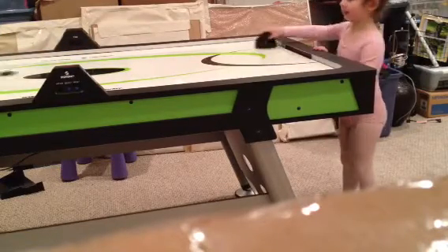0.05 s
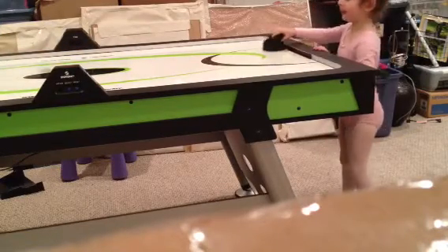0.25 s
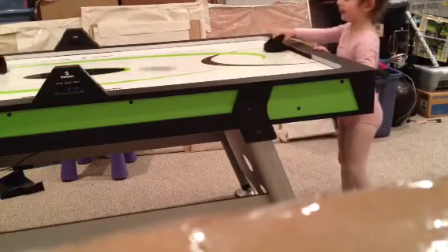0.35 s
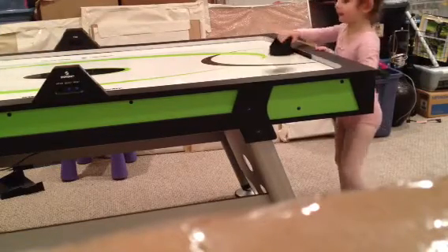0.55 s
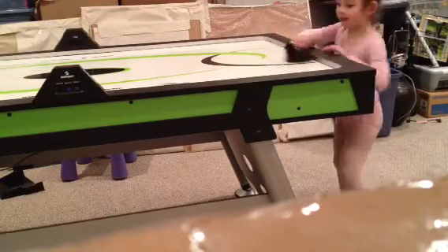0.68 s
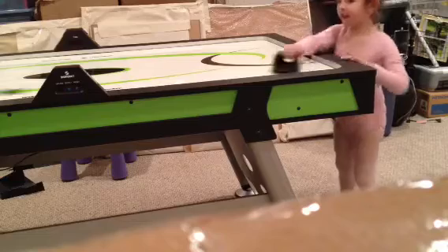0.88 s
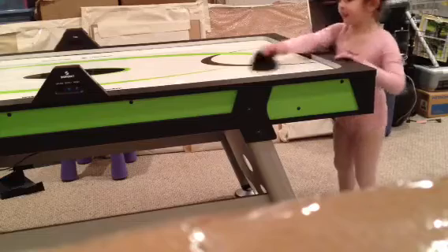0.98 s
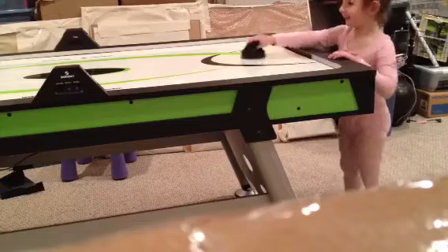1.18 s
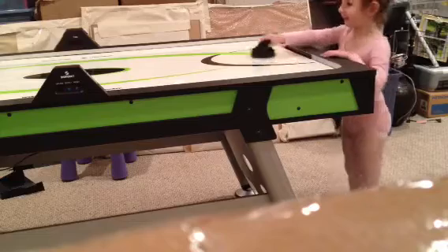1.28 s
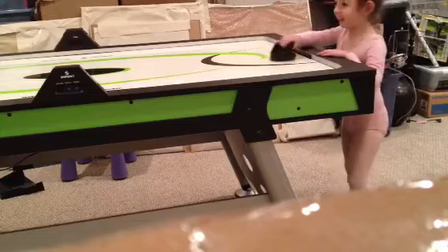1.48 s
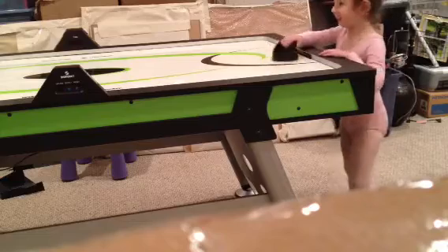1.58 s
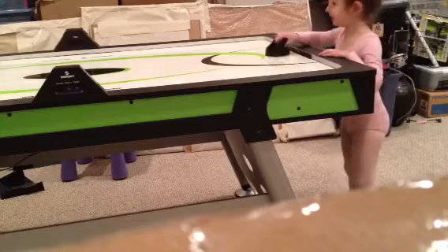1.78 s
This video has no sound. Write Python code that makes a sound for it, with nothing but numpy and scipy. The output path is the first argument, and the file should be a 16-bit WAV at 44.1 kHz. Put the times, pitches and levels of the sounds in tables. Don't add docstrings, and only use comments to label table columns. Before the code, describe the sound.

An air hockey puck gives two faint touches, a hard clack with a hollow table boom, another clack and a soft one, then two quick clacks and a last one, over a soft blower hiss, close microphone.

```python
import sys
import numpy as np
from scipy import signal
from scipy.fft import rfft, irfft, next_fast_len
from scipy.io import wavfile
from scipy.ndimage import uniform_filter1d, map_coordinates

SR = 44100
rng = np.random.default_rng(int(sys.argv[2]) if len(sys.argv) > 2 else 0)


def wav_record(signal):
    frames = np.transpose(np.atleast_2d(signal))
    bounded = np.clip(frames, -1, 1)
    quanta = np.round(bounded * 32767).astype(np.int16)
    wavfile.write(sys.argv[1], SR, quanta)


def volts_from_decibels(level):
    exponent = np.asarray(level, float) / 20
    return 10 ** exponent


N = 81585

# start_s, level_db, direct_over_echoes_db, ceiling_echo_db
CONTACTS = [
    (0.1253, -35.5, -1.5, 5),
    (0.148, -30.5, -9, -21),
    (0.2085, -13, 0.5, 1.5),
    (.5392, -12.5, -8, -5),
    (.6990, -27.5, 1, -2.5),
    (1.1230, -14, -2, 3),
    (1.2031, -13, 1.5, 1.5),
    (1.4969, -15, -1, -1),
]
# start_s, level_under_nearest_contact_db
CHATTER = [(.136, -9.5), (.5610, -9), (.7080, 0.5), (.7165, -4.5), (1.1195, -23), (1.1595, -31),
           (1.4961, -13.5), (1.5285, -24)]
# pitch_hz, level_db
DULL_COLOURS = [
    [(150, -33), (280, -14.5), (600, -2.5), (950, -9.5), (1450, -19.5), (3300, -24), (5200, -42)],
    [(150, -30), (270, -11), (430, -12.5), (517, 4), (620, -17), (1000, -19.5), (1500, -33), (4000, -46.5)],
]
# pitch_hz, level_db
CLACK_COLOURS = [
    [(170, -17), (260, -13.5), (1350, -11.5), (1620, -1.5), (3100, -4.5), (3800, -11), (12300, -22.5),
     (15500, -26)],
    [(200, -31), (480, -4.5), (950, 2), (1200, -3), (3000, -3), (5000, -7), (5600, -22.5), (15500, -25)],
    [(200, -15.5), (650, -3), (850, 3), (2140, -1.5), (5000, -15.5), (5600, -26), (12000, -35.5),
     (15500, -52)],
    [(170, -27), (350, -10), (1300, -16), (1570, -2), (3050, -2.5), (3700, -11.5), (9000, -19.5),
     (15500, -27.5)],
    [(200, -30.5), (490, -4.5), (1060, -2.5), (2900, -4), (5000, -10.5), (5600, -23.5), (11000, -25),
     (15500, -39)],
    [(200, -38), (510, -3), (1340, -3), (1570, 0.5), (2550, -4), (4800, -9), (5600, -19.5), (15500, -28)],
]
# pitch_hz, t60_s
PUCK_MODES = [(8170, 0.014), (10340, 0.027), (12150, 0.012)]
# first_mode_db, second_mode_db, third_mode_db
RING_LEVELS = [(-56, -60, -60), (-60, -60, -60), (-18, -29, -16), (-20, -27.5, -13), (-45, -23, -36),
               (-20, -28.5, -17.5), (-30, -31.5, -28), (-23.5, -34.5, -17)]
RING_TO_ROOM = [-13, -9, -20]
RING_EDGE_DB = -9
CONTACT_T60_S, CEILING_S = 0.0045, 0.0036


def puck():
    out = np.zeros(N + SR)
    t = np.arange(SR // 20) / SR
    contact_s = np.array(CONTACTS)[:, 0]
    colours = DULL_COLOURS + CLACK_COLOURS
    for start_s, under_db in [(s, 0) for s in contact_s] + CHATTER:
        k = np.argmin(np.abs(contact_s - start_s))
        _, level_db, direct_db, ceiling_db = CONTACTS[k]
        clack = click([(60, -80)] + colours[k])
        modes = np.array([volts_from_decibels(db - 6.5 - 60 * t / t60) * np.sin(2 * np.pi * hz * t)
                          for (hz, t60), db in zip(PUCK_MODES, RING_LEVELS[k])])
        ring = modes.sum(axis=0)
        gain = volts_from_decibels(level_db + under_db + 20)
        far = signal.fftconvolve(clack + volts_from_decibels(RING_TO_ROOM) @ modes, room())
        out[round(start_s * SR):][:len(far)] += gain * far
        paths = [(0, direct_db, RING_EDGE_DB), (CEILING_S, ceiling_db, 0)]
        for delay_s, path_db, ring_db in paths:
            crackle = rng.standard_normal(len(t)) * volts_from_decibels(-60 * t / CONTACT_T60_S)
            crackle = crackle / np.linalg.norm(crackle)
            near = signal.fftconvolve(clack, crackle)[:len(t)] + volts_from_decibels(ring_db) * ring
            out[round((start_s + delay_s) * SR):][:len(t)] += gain * volts_from_decibels(path_db) * near
    return out[:N]


def click(colour, size=4410):
    level = volts_from_decibels(along(colour, np.fft.rfftfreq(size, 1 / SR)))
    cepstrum = irfft(np.log(np.maximum(level, 1e-6)), size)
    cepstrum[1:size // 2] *= 2
    cepstrum[size // 2 + 1:] = 0
    impulse = irfft(np.exp(rfft(cepstrum)), size)[:size // 2]
    return impulse / np.linalg.norm(impulse)


# pitch_hz, t60_s
ROOM_DECAY = [(150, 0.58), (400, 0.37), (1000, 0.31), (2800, 0.34), (7000, 0.34), (14000, .2)]
TAIL_DB, TAIL_RISE_S = 5, 0.001
ECHOES, ECHO_SPAN_S, ECHO_DB, ECHO_T60_S = 40, 0.06, -0.5, 0.12


def room():
    hz, t, z = signal.stft(rng.standard_normal(SR // 2), SR, nperseg=256)
    decay = volts_from_decibels(-60 * t / along(ROOM_DECAY, hz)[:, None])
    tail = signal.istft(z * decay, SR, nperseg=256)[1][:SR // 2]
    tail = tail * (1 - np.exp(-np.arange(len(tail)) / SR / TAIL_RISE_S))
    tail = volts_from_decibels(TAIL_DB) * tail / np.linalg.norm(tail)
    when, loss, sign = rng.random((ECHOES, 3)).T
    echo_s = CEILING_S + ECHO_SPAN_S * when
    echoes = volts_from_decibels(ECHO_DB - 60 * echo_s / ECHO_T60_S - 10 * loss) * np.sign(sign - 0.5)
    return tail + np.bincount((echo_s * SR).astype(int), echoes, len(tail))


# start_s, level_db
SLAMS = [
    (0.208, -32.5),
    (1.124, -41),
]
# pitch_hz, level_db, t60_s
TABLE_MODES = [(100, -9, .2), (195, -4, .15), (238, 0, .2), (264, -1, .24), (295, -3, .2), (420, -1, .22),
               (455, -3, .2), (520, -4, .12)]
BOOM_RISE_S = 0.01


def table():
    out = np.zeros(N + SR)
    t = np.arange(SR // 2) / SR
    rise = 1 - np.exp(-t / BOOM_RISE_S)
    for start_s, level_db in SLAMS:
        boom = np.zeros(len(t))
        for hz, db, t60 in TABLE_MODES:
            level = volts_from_decibels(level_db + db + rng.normal(0, 2) - 60 * t / t60)
            boom += level * np.sin(2 * np.pi * (hz * t + rng.random()))
        out[round(start_s * SR):][:len(t)] += rise * boom
    return out[:N]


# pitch_hz, level_db per Hz
HISS_COLOUR = [(40, -36), (85, -20), (130, -6.5), (250, 2), (1200, 1), (2000, -4), (5000, -15.5),
               (15500, -27)]
# pitch_hz, level_db
MOTOR_LINES = [(120, -65), (240, -62), (967, -58)]
HISS_DB, PATCHY_DB = -49, -2


def blower():
    hz, _, z = signal.stft(rng.standard_normal(N), SR, nperseg=1024)
    patches = uniform_filter1d(rng.standard_normal(z.shape), size=10, axis=0)
    patches = uniform_filter1d(patches, size=6, axis=1)
    level_db = PATCHY_DB * unit(patches) + along(HISS_COLOUR, hz)[:, None]
    hiss = signal.istft(z * volts_from_decibels(level_db), nperseg=1024)[1][:N]
    t = np.arange(N) / SR

    def sway():
        return map_coordinates(rng.standard_normal(size=20), [t * 8])

    hum = np.zeros(N)
    for line_hz, db in MOTOR_LINES:
        hum += volts_from_decibels(db - 5 + 2 * sway()) * np.sin(2 * np.pi * line_hz * t + 0.64 * sway())
    return volts_from_decibels(HISS_DB) * unit(hiss) + hum


def unit(x):
    return x / np.sqrt(np.mean(x ** 2) + 1e-20)


def along(points, hz):
    f, v = np.transpose(points)
    return np.interp(np.log(hz + 1), np.log(f + 1), v)


def scene():
    return (puck() + table() + blower())[None]


def band_limit(x):
    return signal.sosfilt(signal.butter(12, 16480, fs=SR, output="sos"), x)


# pitch_hz, level_db
MIC_COLOUR = [(50, -16), (110, 1), (250, 1.5), (1500, 0), (5100, 0), (5500, 0), (7500, 1), (14000, 4)]
TOP_HZ = 15350


def record(dry):
    limited = dry / (1 + np.abs(dry / 0.7) ** 4) ** 0.25
    size = next_fast_len(N + SR // 2)
    response = MIC_COLOUR + [(TOP_HZ - 60, 0), (TOP_HZ + 60, -24), (16400, -36), (16700, -90)]
    gain = volts_from_decibels(along(response, np.fft.rfftfreq(size, 1 / SR)))
    mix = irfft(rfft(limited, size) * gain, size)[..., :N]
    return band_limit(mix)


dry = scene()
out = record(dry)
wav_record(out)
```